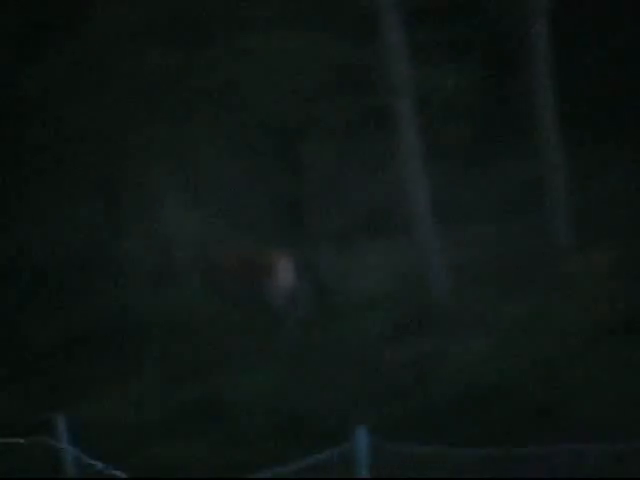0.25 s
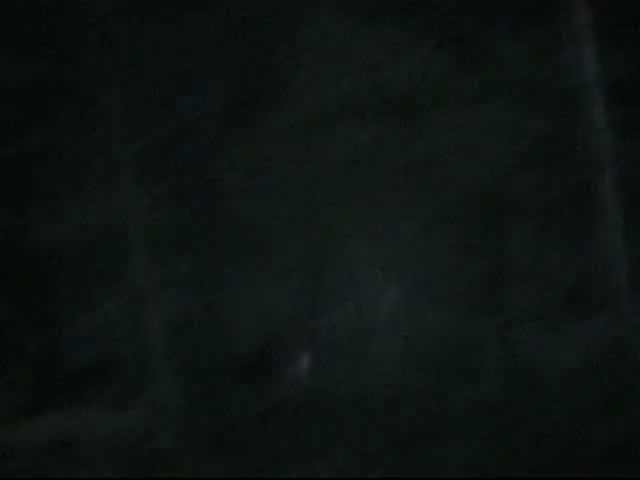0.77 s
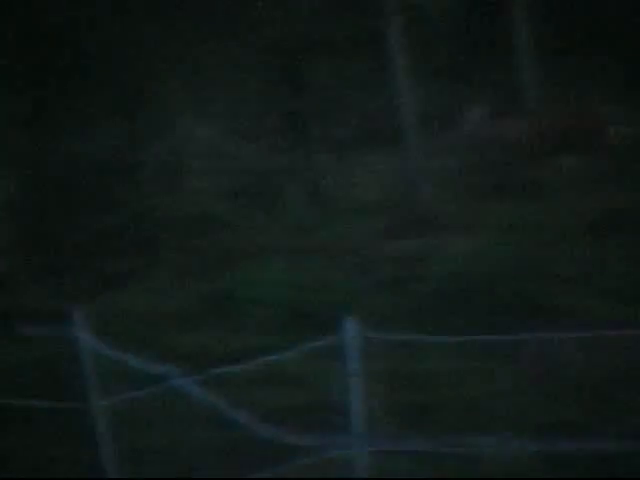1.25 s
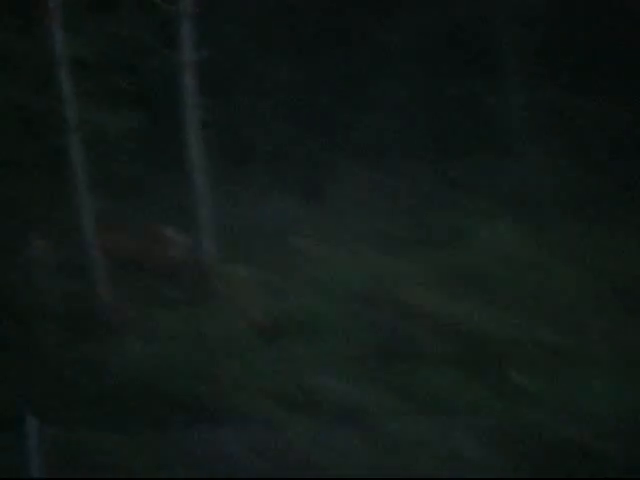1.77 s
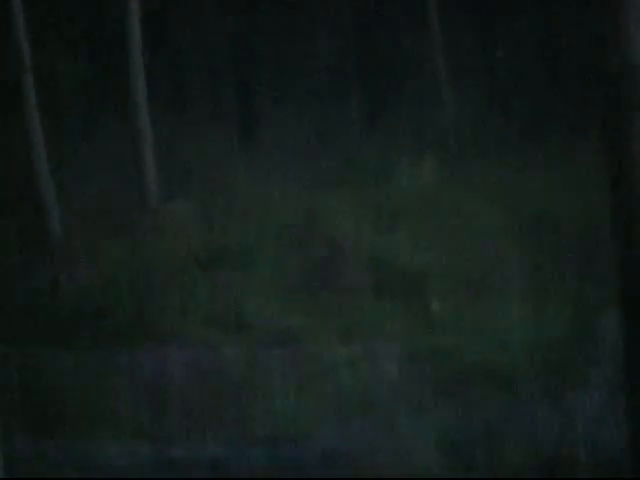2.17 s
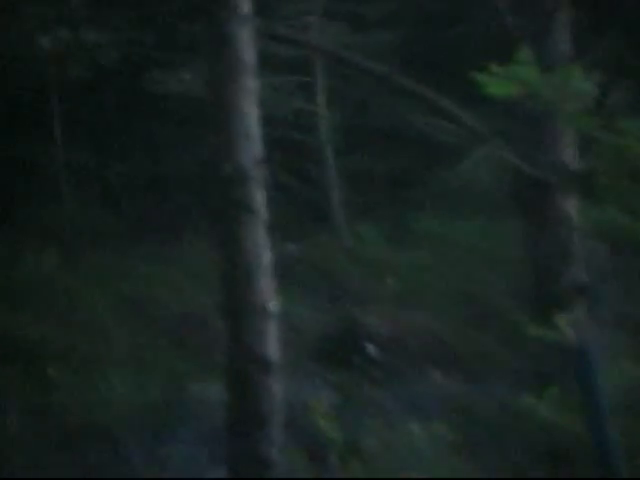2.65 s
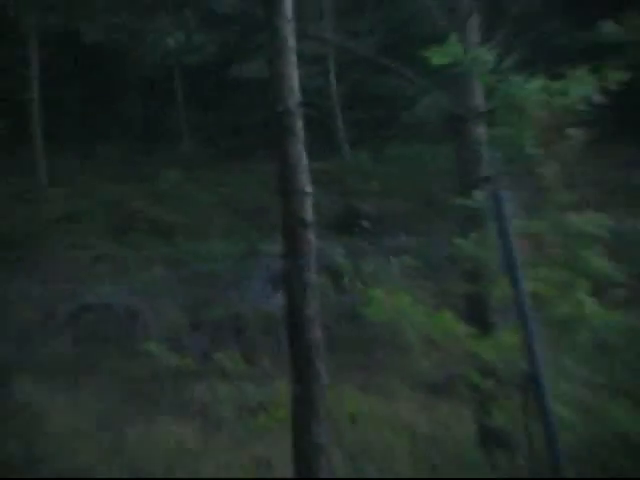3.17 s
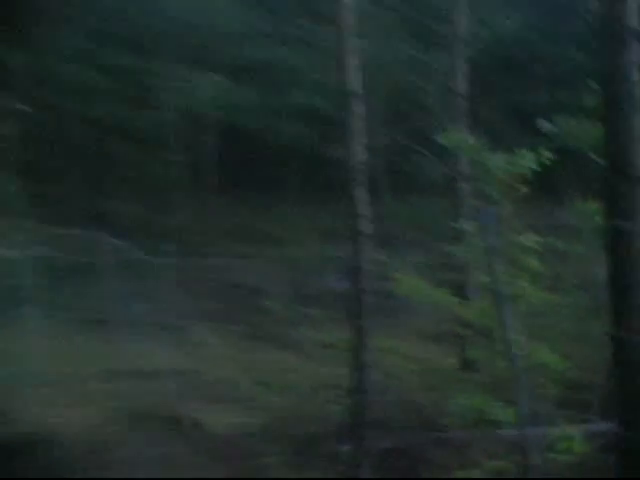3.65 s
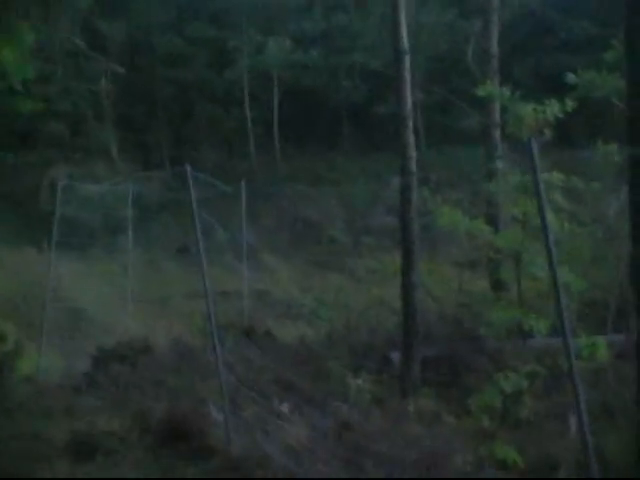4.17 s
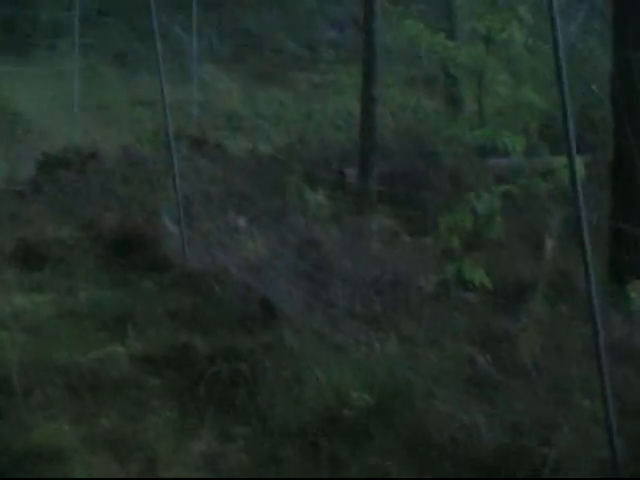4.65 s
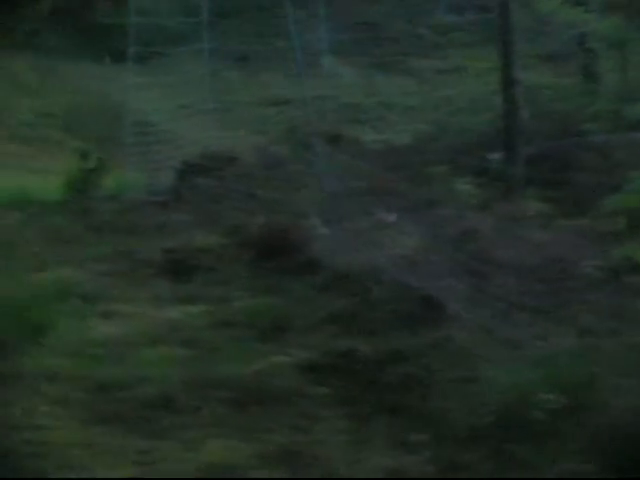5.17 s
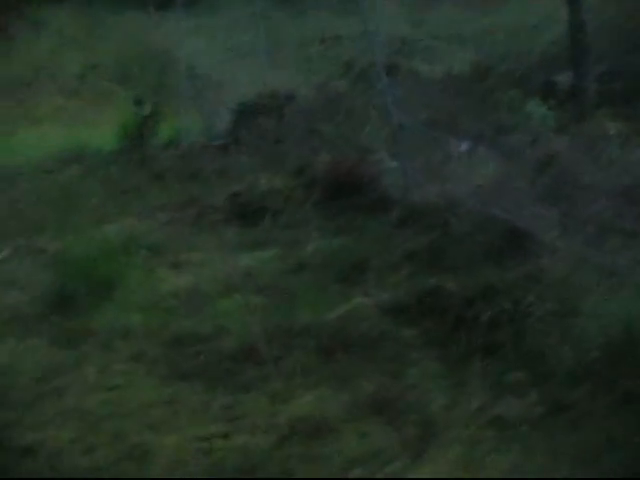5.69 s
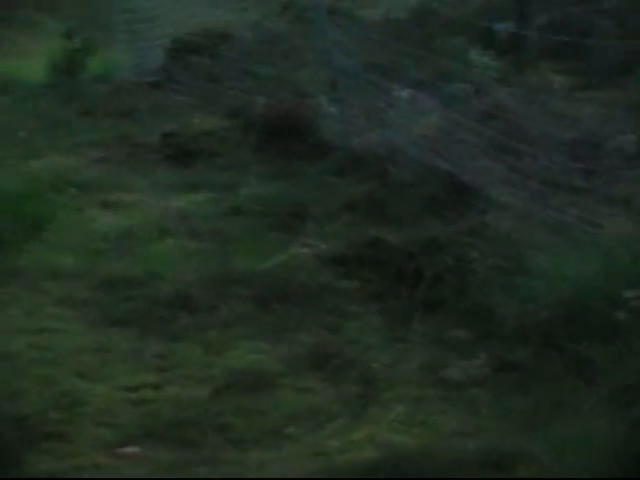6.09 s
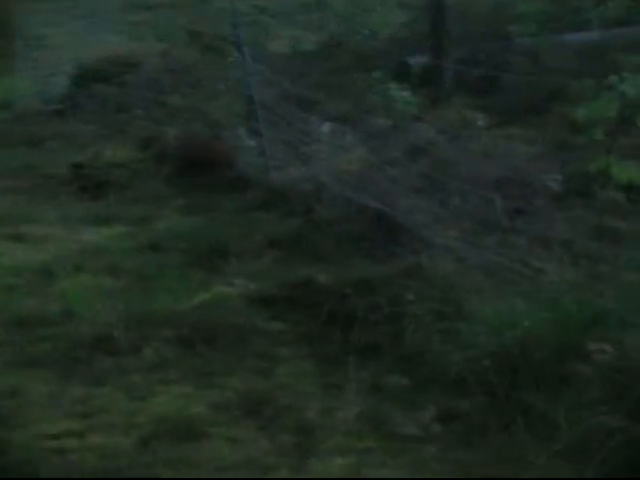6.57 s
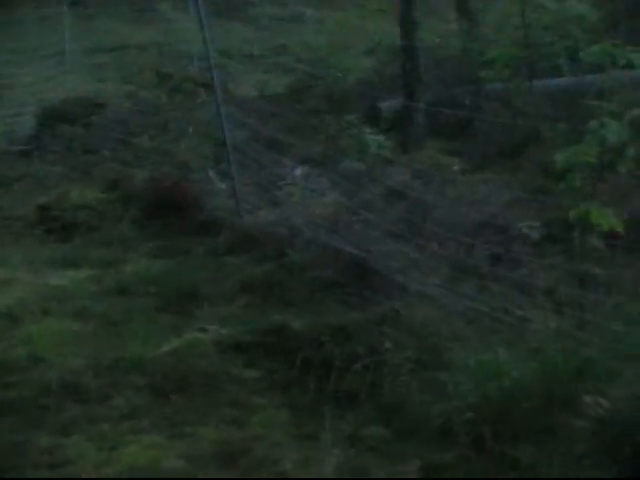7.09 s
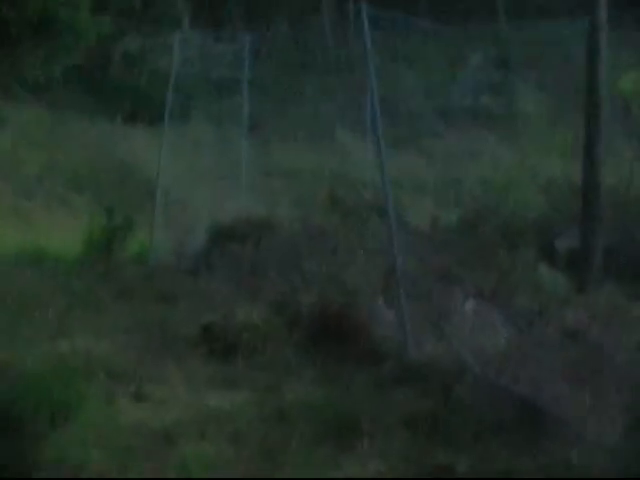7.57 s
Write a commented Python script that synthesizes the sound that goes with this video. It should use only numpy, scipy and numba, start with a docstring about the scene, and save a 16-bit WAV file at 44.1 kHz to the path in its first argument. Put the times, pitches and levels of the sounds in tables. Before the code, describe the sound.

In a quiet forest at dusk a short moan runs into a loud, harsh, sinking stag roar with a long woodland echo. A clear, nearer roar follows, then after a gap a rattling low growl and the start of another call. A hand-held camera microphone adds steady low hum, deep handling rumble, thuds and a sharp click midway; cloth rustles and feet shuffle softly.

```python
"""A harsh stag's roar fills the forest after a short moan; a clear nearer roar, a growl and a fourth's start follow.
Each call is a train of vocal-fold pulses ringing in a long throat; in the three main ones the resonances sink
as the neck stretches. Trunks give early echoes, the wood a long tail, the far forest edge a late swell.
Close by, a hand-held camera hums, whines, rumbles, knocks and clicks, with one thin squeak.
Behind lie rustling clothing, shuffling feet, a very distant stag and still air."""
import sys
import numpy as np
from scipy import signal
from scipy.fft import rfft, irfft, next_fast_len
from scipy.io import wavfile
from scipy.ndimage import uniform_filter1d
from numba import njit

SR = 44100
rng = np.random.default_rng(int(sys.argv[2]) if len(sys.argv) > 2 else 0)


def inscribe(sig):
    """Save sig as 16-bit PCM at rate SR to the path in sys.argv[1].

    A 1-D sig is mono; a 2-D sig holds one channel per row.
    Samples are clipped to [-1, 1] before scaling.
    """
    pcm = np.round(np.clip(np.atleast_2d(sig).T, -1, 1) * 32767)
    wavfile.write(sys.argv[1], SR, pcm.astype(np.int16))


N = 345258
TIME = np.arange(N) / SR

# course of each call: (start [s], crest [s], end [s]); the last is past its crest when it starts
MOAN_TIMES = (1.358, 1.456, 1.595)
HARSH_TIMES = (1.536, 2.075, 2.48)
CLEAR_TIMES = (3.015, 3.56, 3.75)
GROWL_TIMES = (5.935, 6.34, 6.56)
LAST_TIMES = (7.48, 7.35, 7.88)
# voice pitch: (time [s], pulse rate [Hz]); the chest plays the harsh one too
MOAN_PITCH = [(1.37, 88), (1.54, 98)]
HARSH_PITCH = [(1.54, 77.14), (1.71, 93.17), (1.78, 85.5), (1.87, 83.32), (2.05, 106.4), (2.11, 122.2),
               (2.3, 130)]
CLEAR_PITCH = [(3.02, 45), (3.11, 84.5), (3.16, 94.8), (3.28, 93.9), (3.53, 102), (3.59, 100.8), (3.65, 96),
               (3.7, 86), (3.74, 72)]
GROWL_PITCH = [(5.94, 46), (6.115, 46), (6.163, 32), (6.25, 40), (6.355, 54), (6.375, 29), (6.45, 28),
               (6.49, 15)]
LAST_PITCH = [(7.471, 79.7), (7.55, 92.1), (7.648, 103.4), (7.74, 97), (7.83, 96.5)]
# low, middle and high register, before onset, release and heaves:
# (level at the crest [dB], attack [s], swell before the crest [dB/s], fade after it [dB/s])
MOAN_REGISTERS = [(-78, .02, 1.5, 11), (-56.5, .03, 30, 108), (-56.5, .025, 9, 59.5)]
HARSH_REGISTERS = [(-31, 0.063, 10.8, 42), (-37, 0.064, 4.6, 33), (-51, 0.067, 5.5, 14.7)]
CLEAR_REGISTERS = [(-38.5, 0.0085, 23, 5.6), (-36.5, 0.056, 8.7, 16), (-38.5, 0.075, 4.3, 19)]
GROWL_REGISTERS = [(-50, 0.01, 22, 33), (-50, 0.016, 1, 32), (-51.5, 0.028, 29, 54)]
LAST_REGISTERS = [(-51.5, 0.0083, 1, 20.3), (-53, 0.016, 1, 18), (-54.5, 0.036, 8, 2.5)]
# throat resonances of a stretching neck, before evening and rebound:
# (start frequency [Hz], stretched frequency [Hz], glide [s], width [Hz], level [dB])
HARSH_THROAT = [(473, 395.2, 0.42, 52, 10), (742, 496.6, 0.53, 49, 6.5), (1193, 759, 0.542, 50, -3.5),
                (1286, 1092, 0.32, 40, -1.5), (1410, 1215, 0.57, 53, -8.5), (1840, 1475, 0.49, 94, -18.5),
                (2110, 1962, 0.51, 110, -10), (2440, 2276, 0.29, 190, -8.5), (2900, 2870, 0.54, 240, -24.5),
                (3400, 3300, 0.19, 170, -15.5)]
CLEAR_THROAT = [(222, 217.5, 0.14, 24, -4.5), (533, 468.6, 0.62, 30, -5), (850, 738, 0.28, 44, -4.5),
                (1180, 1068, .5, 60, -5.5), (1360, 1215, 0.7, 43.4, 2), (1695, 1550, 0.5, 35, 2.5),
                (1950, 1960, 0.4, 107, 8), (2482, 2420, 0.87, 67, 4.5), (2800, 2800, 0.56, 70, -13),
                (3280, 3135, 0.45, 52, -8.5)]
GROWL_THROAT = [(443, 392, 0.43, 50, 7), (610, 526, 0.45, 45, 8), (1028, 865, 0.32, 24, 8.5),
                (1410, 1230, 0.38, 31, -1.5), (1720, 1510, .37, 20, -3), (2460, 1785, 0.32, 65, 1),
                (2450, 2140, 0.36, 40, 6), (2510, 2380, 0.28, 68, 5.5), (3070, 2700, 0.4, 55, -13),
                (3570, 2960, 0.49, 84, -13)]
# throats held still: (frequency [Hz], width [Hz], level [dB])
MOAN_THROAT = [(480, 150, 3), (1240, 170, -16), (1810, 110, -6), (2130, 210, -5.5)]
LAST_THROAT = [(430, 320, 13), (1250, 160, 2.5), (1630, 300, 2), (2220, 310, 2.5), (2780, 240, 0),
               (3180, 250, -3)]
# kinds of voice: (pitch jitter [share], shimmer [dB], rasp [share])
FLUTTERING = (.12, 3, .6)
SMOOTH = (.002, .6, .1)
RASPING = (.004, 1.3, .25)
ROUGH = (.017, 3, .33)


def stags():
    """All calls, direct and by way of the trees; the harsh roar drives the forest hardest."""
    harsh_throat = stretching(HARSH_THROAT, HARSH_TIMES, rebound=0, evening=0.037)
    clear_throat = stretching(CLEAR_THROAT, CLEAR_TIMES, rebound=0.066, evening=0.065)
    growl_throat = stretching(GROWL_THROAT, GROWL_TIMES, rebound=0, evening=0.35)
    moan = roar(MOAN_TIMES, MOAN_PITCH, MOAN_REGISTERS, MOAN_THROAT, FLUTTERING, hiss_db=-18.0)
    harsh = roar(HARSH_TIMES, HARSH_PITCH, HARSH_REGISTERS, harsh_throat, ROUGH, hiss_db=-24.0)
    clear = roar(CLEAR_TIMES, CLEAR_PITCH, CLEAR_REGISTERS, clear_throat, SMOOTH, hiss_db=-37)
    growl = roar(GROWL_TIMES, GROWL_PITCH, GROWL_REGISTERS, growl_throat, RASPING, hiss_db=-27)
    last = roar(LAST_TIMES, LAST_PITCH, LAST_REGISTERS, LAST_THROAT, SMOOTH, hiss_db=-21.5)
    others = moan + clear + growl + last
    to_trunks = from_db(-5) * (harsh + last) + from_db(-6) * growl + from_db(-18) * clear
    early = trunks(to_trunks, spread_s=.08)
    # the low register spreads all round and carries furthest among the trees
    to_forest = from_db(-2.0) * harsh + from_db(-11.5) * others + from_db(-10.5) * band(others, 900, "low")
    late = forest(to_forest, edge_s=0.515, edge_db=-14.5, build_s=0.015)
    return harsh + chest(level_db=5.5) + others + early + late


# heaves of effort within the calls: (time [s], half length [s], boost [dB])
HEAVES = [(1.702, 0.023, 4.5), (1.915, 0.067, 2), (2.111, 0.039, 5.5), (2.355, 0.041, 3.5), (6.07, 0.12, 5),
          (6.332, 0.067, 5)]


def roar(times, pitch, registers, throat, roughness, hiss_db):
    """Pulses ring in the throat; the opening mouth sets the strength of its low, middle and high registers."""
    span = (TIME > times[0]) & (TIME < times[-1])
    t, out = TIME[span], np.zeros(N)
    sounding = TIME[TIME > pitch[0][0]]
    pitch_hz = curves(pitch, sounding)[0]
    source = np.interp(t, sounding, folds(sounding, pitch_hz, *roughness))

    rings = []
    for k, (hz, width, db) in enumerate(throat):
        centre = np.full(N, hz, float)[span]
        gain = from_db(np.full(N, db, float)[span])
        narrow = resonate(source, centre, float(width), SR)
        # a broad second pass darkens the valleys between resonances
        ring = resonate(narrow, centre, 500., SR)
        rings.append(gain * ring * (-1) ** k)

    heave_db = sum(db * np.exp(-((t - s) / half_s) ** 2) for s, half_s, db in HEAVES)
    levels_db = [db + heave_db for db in envelopes(times, registers, t)]
    # the topmost resonance speaks only at full effort
    effort = from_db(1.08 * (levels_db[2] - levels_db[2].max()) + 2.0)
    voice = band(sum(rings[:-1]) + effort * rings[-1], 4040, "low", order=4)
    low = band(voice, 700, "low", order=5)
    middle = band(voice, [700, 1700], "band", order=5)
    high = band(voice, 1700, "high", order=5)
    for part, db in zip((low, middle, high), levels_db):
        out[span] += evened(part, size=3500) * from_db(db)
    # a little of the rasp escapes above the throat's resonances
    hiss = rms_one(band(source, [3400, 5400], "band"))
    out[span] += hiss * from_db(levels_db[2] + hiss_db)
    out[span] *= signal.windows.tukey(len(t), .03)
    return out


def folds(t, pitch_hz, jitter, shimmer_db, rasp):
    """Vocal folds: one uneven pulse a cycle, each followed by a puff of turbulence."""
    cycles = np.cumsum(pitch_hz * (1 + jitter * drift(90, t))) / SR + 2 / 3
    # the root keeps pulse power steady as the pitch moves
    pulses = np.diff(np.floor(cycles), prepend=0) * np.sqrt(SR / pitch_hz)
    since_pulse_s = (cycles % 1) / pitch_hz
    puffs = rms_one(rng.standard_normal(len(t)) * np.exp(-since_pulse_s / 0.012))
    return (pulses + rasp * puffs) * from_db(shimmer_db * drift(55, t))


@njit
def resonate(x, hz, width, sr):
    """A two-pole resonance with a moving centre and gain near 1 on top."""
    y, r = np.zeros(len(x)), np.exp(-np.pi * width / sr)
    for i in range(2, len(x)):
        drive = (1 - r * r) / 2 * (x[i] - x[i - 2])
        y[i] = drive + 2 * r * np.cos(2 * np.pi * hz[i] / sr) * y[i - 1] - r * r * y[i - 2]
    return y


def envelopes(times, registers, t):
    """Level of each register [dB]: it opens, swells towards the crest, fades and is released."""
    start, crest, end = times
    onset_db, release_db, release_s = 19.5, 22, 0.025
    release = release_db * np.exp((t - end) / release_s)
    levels = []
    for db, attack_s, rise, fade in registers:
        onset = onset_db * np.exp(-(t - start) / attack_s)
        slopes = rise * np.maximum(crest - t, 0) + fade * np.maximum(t - crest, 0)
        levels.append(db - onset - slopes - release)
    return levels


def stretching(throat, times, rebound, evening):
    """Resonances sink as the neck stretches, even out as the mouth opens, and rise by a share as it relaxes."""
    start, crest, end = times
    relaxing = 1 + rebound * np.interp(TIME, [crest, end], [0, 1])
    contrast = 1 - evening * np.interp(TIME, [start, crest], [0, 1]) ** 2
    moving = []
    for first_hz, last_hz, glide_s, width, db in throat:
        hz = np.interp(TIME, [start, start + glide_s], [first_hz, last_hz])
        moving.append((hz * relaxing, width, db * contrast))
    return moving


# course of the harsh roar's fundamental: (time [s], level before the overall gain [dB])
CHEST = [(1.54, -53.5), (1.792, -41.5), (2.02, -42.5), (2.15, -59.5), (2.46, -53)]


def chest(level_db):
    """The deep fundamental under the harsh roar: a sine at its pulse rate with a weak octave."""
    phase = 2 * np.pi * np.cumsum(curves(HARSH_PITCH, TIME)[0]) / SR
    return from_db(level_db) * swell(CHEST) * (np.sin(phase) + 0.2 * np.sin(2 * phase))


def trunks(x, spread_s, count=40):
    """Early echoes from the nearest trees: random taps that weaken with delay, unit energy in all."""
    delay, strength = rng.uniform(.004, .16, count), rng.standard_normal(count)
    response = np.zeros(SR // 2)
    response[(delay * SR).astype(int)] = strength * np.exp(-delay / spread_s)
    return signal.fftconvolve(x, response / np.linalg.norm(response))[:N]


# the forest's answer by band: (frequency [Hz], time to fall 60 dB [s], relative level [dB])
FOREST = [(100, 1.2, -13), (262, 3.3, 0), (453, 2.62, 5), (750, 2.3, -27), (1214, 1.68, 2.5),
          (2470, 1.05, 5.5), (4620, 0.85, 8)]


def forest(x, edge_s, edge_db, build_s):
    """Scatter from countless trunks dies away by band; the far forest edge sends back a late swell."""
    t, response = TIME[:2 * SR], 0
    edge = from_db(edge_db) * np.exp(-((t - edge_s) / 0.024) ** 2)
    for hz, t60, db in FOREST:
        scatter = band(rng.standard_normal(len(t)), [hz / 1.226, hz * 1.432], "band")
        decay = from_db(-60 * t / t60) * (1 - np.exp(-t / build_s))
        response = response + from_db(db) * scatter * (decay + edge) / np.sqrt(np.sum(decay ** 2))
    return signal.fftconvolve(x, response)[:N]


# touches, before the overall gains: (time [s], thud level [dB], knock level [dB], snap level [dB])
TOUCHES = [(0.588, -30.5, -62, -80), (2.295, -28, -60, -80), (3.009, -32.5, -43, -78),
           (4.095, -35, -39, -54), (4.36, -51, -47, -53), (4.501, -26, -24.5, -39), (4.51, -45, -26, -49),
           (4.519, -26.5, -30.5, -46), (4.608, -47, -37, -55), (4.636, -57, -57, -48),
           (4.648, -50, -46, -41), (5.453, -36.5, -36, -51), (5.73, -42, -40, -65),
           (7.495, -34, -44, -51.5)]
# fine ticks, before the overall gain: (time [s], level [dB])
TICKS = [(0.278, -42.5), (0.316, -47), (1.894, -36.5), (3.266, -41), (3.6587, -35.5), (4.462, -44),
         (5.703, -39), (5.799, -45)]
# resonances of the housing: (frequency [Hz], width [Hz], relative level [dB])
HOUSING = [(205, 34, 5.5), (420, 56, 1.5), (584.2, 60, 8.5), (763, 78, 12), (908, 55, 6.5)]
# spectra of snap, tick and the thud (also the hand's buffeting): (frequency [Hz], relative level [dB])
SNAP_COLOUR = [(1200, -11), (1700, 7), (2400, 14.5), (3300, 2), (4700, 2), (6000, -30), (12000, -40)]
TICK_COLOUR = [(3500, 14.5), (4500, 15), (7000, 6), (14000, -15)]
BUFFET_COLOUR = [(40, -18.5), (60, 1), (100, -4.5), (210, -10), (300, -21), (900, -34)]


def handling(thud_db, knock_db, snap_db, tick_db, thud_s, knock_s, snap_s, tick_s):
    """Each touch gives a thud, a knock ringing in the housing and a snap; fine ticks fall between."""
    out, t = np.zeros(N + SR), TIME[:SR // 4]
    for s, thud, knock, snap in TOUCHES:
        contact = rng.standard_normal(len(t)) * np.exp(-t / knock_s)
        body = 0
        for hz, width, db in HOUSING:
            body = body + from_db(db) * resonate(contact, np.full(len(t), float(hz)), float(width), SR)
        body = band(body, 1050, "low", order=4)
        thud_shape = np.exp(-t / thud_s) * (1 - np.exp(-t / 0.0015))
        sound = from_db(thud + thud_db) * noise(BUFFET_COLOUR, size=len(t)) * thud_shape
        sound += from_db(knock + knock_db) * body / np.abs(body).max()
        sound += from_db(snap + snap_db) * noise(SNAP_COLOUR, size=len(t)) * np.exp(-t / snap_s)
        out[int(s * SR):int(s * SR) + len(t)] += sound
    for s, db in TICKS:
        tick = from_db(db + tick_db) * noise(TICK_COLOUR, size=len(t)) * np.exp(-t / tick_s)
        out[int(s * SR):int(s * SR) + len(t)] += tick
    return out[:N]


def squeak(at_s, hz, length_s, level_db):
    """One thin, high squeak: a brief bump of narrow noise."""
    colour = [(hz * 0.86, -20), (hz, 0), (hz * 1.12, -11), (hz * 1.4, -16)]
    return from_db(level_db) * noise(colour) * bump(at_s, length_s)


# faint camera whine, before a 2 dB lift: (frequency [Hz], rms level [dB])
WHINE = [(3898, -90), (4048, -93), (4199, -88.5), (4500, -87.5)]


def camera_hum():
    """A steady hum that wavers slightly in pitch and level, with faint fixed whine tones."""
    hum_hz = 149.5 + 0.95 * drift(5, TIME)
    hum_db = -50 + 1.27 * drift(8, TIME)
    hum = from_db(hum_db) * np.sin(2 * np.pi * np.cumsum(hum_hz) / SR)
    whine = sum(from_db(db + 2.0) * np.sin(2 * np.pi * hz * TIME) for hz, db in WHINE)
    return np.sqrt(2) * (hum + whine)  # sine peak from rms level


# sways of the hand that holds the camera: (time [s], half length [s], rumble level [dB], buffet level [dB])
SWAYS = [(0.015, 0.15, -30.5, -62), (0.63, 0.097, -31, -64), (1.72, 0.16, -33, -47),
         (2.217, 0.2, -29, -41.5), (2.662, 0.12, -27.5, -48), (3.101, 0.092, -31.5, -46.5),
         (3.6, 0.15, -33, -42), (4.566, 0.072, -26, -47), (5.39, 0.42, -33, -52), (6.132, 0.15, -38, -47),
         (6.417, 0.057, -38.5, -48), (7.005, 0.091, -29, -47.5), (7.583, 0.37, -27.5, -41)]
# rumble spectrum: (frequency [Hz], relative level [dB])
RUMBLE_COLOUR = [(15, -12), (25, -9.5), (35, -0.5), (48, -19), (70, -25.5), (120, -35)]


def hand_sway():
    """The moving hand: deep rumble and buffeting noise swell with each sway above a resting level."""
    rumble_gain = movements([(s, half_s, db) for s, half_s, db, _ in SWAYS], still_db=-39)
    buffet_gain = movements([(s, half_s, db) for s, half_s, _, db in SWAYS], still_db=-56)
    rumble = rumble_gain * evened(noise(RUMBLE_COLOUR), size=4000)
    return rumble + buffet_gain * noise(BUFFET_COLOUR)


# brushes of clothing: (time [s], half length [s], level [dB])
BRUSHES = [(3.47, 0.33, -65), (4.58, 0.28, -65.5), (5.36, 0.15, -67.5), (5.79, 0.044, -61.5),
           (6.38, 0.24, -67), (7.63, 0.26, -66)]
# clothing spectrum: (frequency [Hz], relative level [dB])
RUSTLE_COLOUR = [(1500, 9), (4000, 3), (7000, -5.5), (15000, -13)]


def clothing():
    """Rustling cloth: bright noise made grainy by a fast random level."""
    return movements(BRUSHES, still_db=-81) * noise(RUSTLE_COLOUR) * from_db(2.7 * drift(150, TIME))


# course of the shuffling feet, before a 3.5 dB lift: (time [s], level [dB])
SHUFFLE = [(4.3, -59.5), (4.804, -59.5), (5.92, -59)]
# shuffle spectrum: (frequency [Hz], relative level [dB])
SHUFFLE_COLOUR = [(250, 0), (480, 5), (750, -5), (1500, -10.5), (3000, -21.5), (7000, -32.5)]


def feet():
    """Shuffling feet: duller noise with a coarse, uneven grain."""
    grain = from_db(4.5 * drift(54, TIME))
    return from_db(3.5) * swell(SHUFFLE, fade=0.18) * noise(SHUFFLE_COLOUR) * grain


# course of the very distant stag, before a 0.5 dB cut: (time [s], level [dB])
FAR_ROAR = [(0.8, -60.5), (1.398, -55.5), (1.5, -96)]


def distant_stag():
    """A very distant roar, blurred to a narrow band of noise."""
    return from_db(-0.5) * swell(FAR_ROAR, fade=0.041) * noise([(320, 0), (380, 5), (470, -10), (560, -23)])


# spectrum of still air: (frequency [Hz], relative level [dB])
AIR_COLOUR = [(170, 4), (280, -4.5), (400, -2), (700, -10), (1400, -16.5), (2500, -21.5), (4400, -27),
              (7000, -31.5), (15500, -35)]


def still_air():
    """Steady noise, darkening towards the treble."""
    return from_db(-57) * noise(AIR_COLOUR)


def from_db(db):
    """Decibels to gain."""
    return 10 ** (np.asarray(db) / 20)


def rms_one(x):
    """Scale to unit power."""
    return x / np.sqrt(np.mean(x ** 2) + 1e-20)


def curves(rows, t):
    """Each column of a table, joined by straight lines in time."""
    s, *columns = np.transpose(rows)
    return [np.interp(t, s, c) for c in columns]


def swell(rows, fade=0.035):
    """Gain that follows a level table and fades away outside it over fade seconds."""
    inside = np.minimum(TIME - rows[0][0], rows[-1][0] - TIME)
    return from_db(curves(rows, TIME)[0]) * np.clip(1 + inside / fade, 0, 1)


def bump(at_s, half_s):
    """A smooth rise and fall of height 1."""
    return np.exp(-np.minimum(((TIME - at_s) / half_s) ** 2, 50))


def movements(rows, still_db):
    """Gain of separate movements, added in power above a resting level."""
    power = sum((from_db(db) * bump(s, half_s)) ** 2 for s, half_s, db in rows)
    return np.sqrt(from_db(still_db) ** 2 + power)


def band(x, hz, kind, order=2):
    """Butterworth filter."""
    sos = signal.butter(order, np.clip(hz, 10, .45 * SR), kind, fs=SR, output="sos")
    return signal.sosfilt(sos, x + 1e-18)


def noise(colour, size=N):
    """Noise of a given spectrum, falling 30 dB per octave further beyond its ends; rms 1."""
    hz, db = np.transpose(colour)
    padded = next_fast_len(size)
    octave = np.log2(np.maximum(np.arange(padded // 2 + 1) * SR / padded, 1))
    beyond = np.abs(octave - np.clip(octave, np.log2(hz[0]), np.log2(hz[-1])))
    gain = from_db(np.interp(octave, np.log2(hz), db) - 30 * beyond)
    return rms_one(irfft(rfft(rng.standard_normal(padded)) * gain, padded)[:size])


def drift(rate, t):
    """Random wander about 0: normal values, rate of them a second, joined by lines."""
    knots = np.arange(0, N / SR + 1, 1 / rate)
    return np.interp(t, knots, rng.standard_normal(len(knots)))


def evened(x, size):
    """Hold the short-term power at 1."""
    return x / np.sqrt(np.abs(uniform_filter1d(x ** 2, size)) + 1e-14)


def scene():
    """Stags, handling, camera and surroundings summed to one channel."""
    touches = handling(thud_db=1, knock_db=5.0, snap_db=0, tick_db=-12.5,
                       thud_s=0.028, knock_s=0.0037, snap_s=0.0067, tick_s=0.003)
    close = touches + squeak(at_s=4.428, hz=7700, length_s=.018, level_db=-62.5) + camera_hum() + hand_sway()
    surroundings = clothing() + feet() + distant_stag() + still_air()
    return (stags() + close + surroundings)[None]


def record(dry):
    """The sound fades in over 10 ms and the top is cut steeply at 15750 Hz."""
    steep_cut = signal.ellip(12, .1, 80, 15750, fs=SR, output="sos")
    return signal.sosfilt(steep_cut, dry * np.minimum(TIME / .01, 1))


dry = scene()
out = record(dry)
inscribe(out)
```